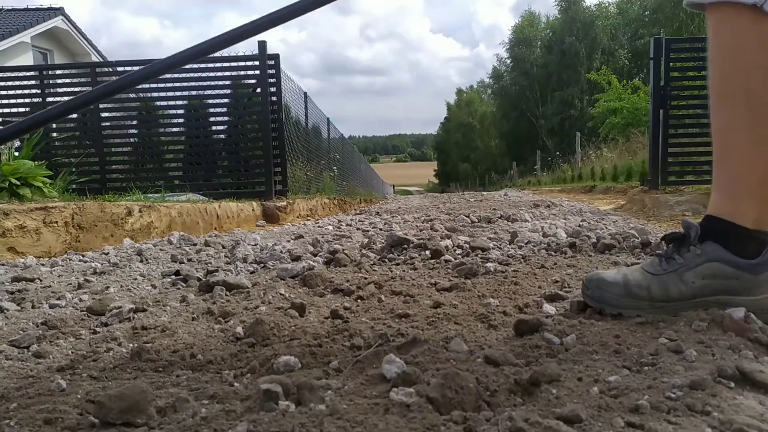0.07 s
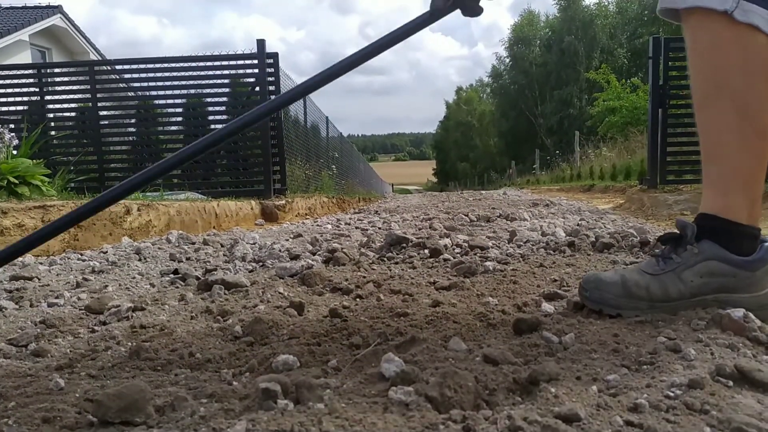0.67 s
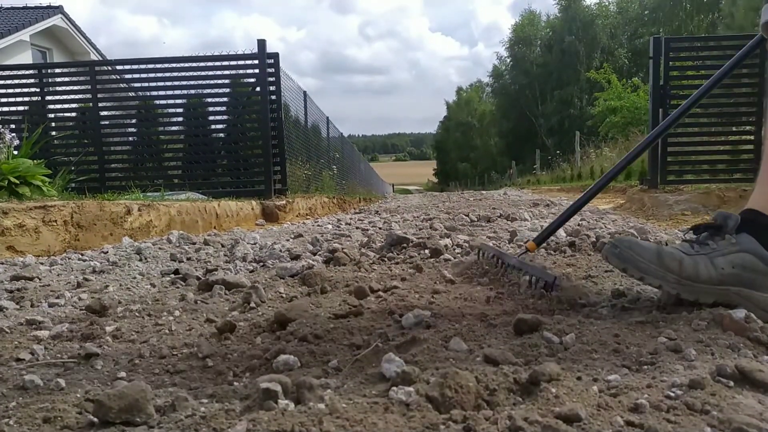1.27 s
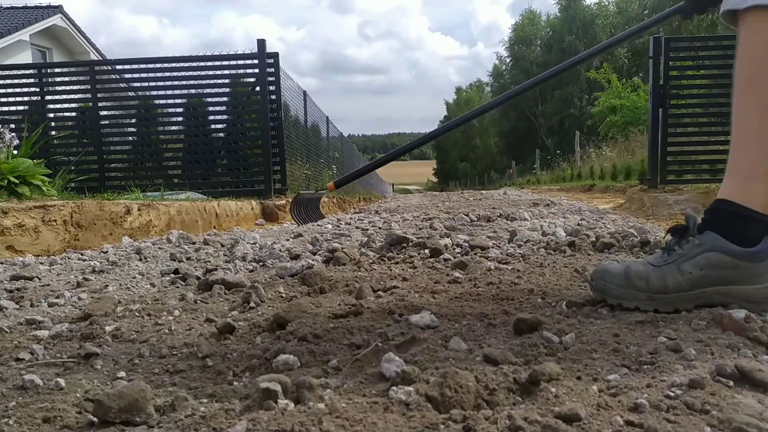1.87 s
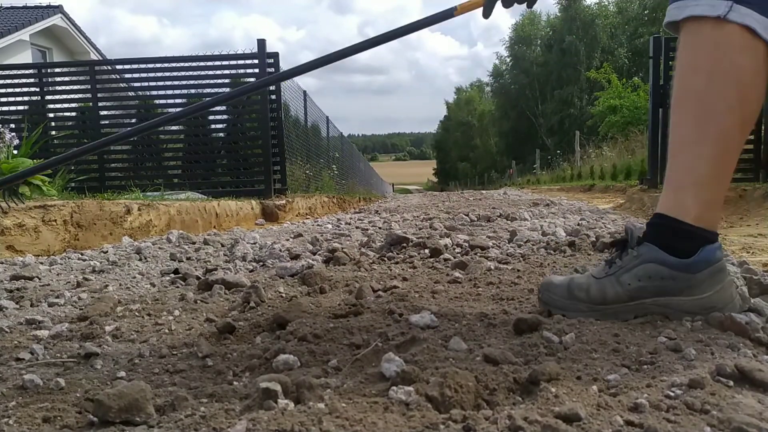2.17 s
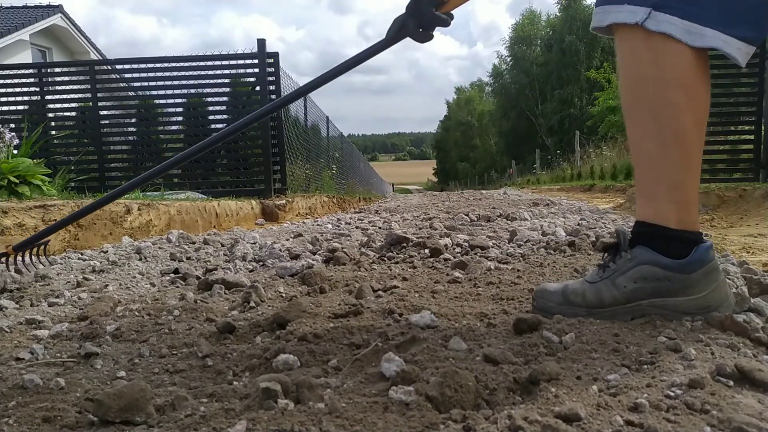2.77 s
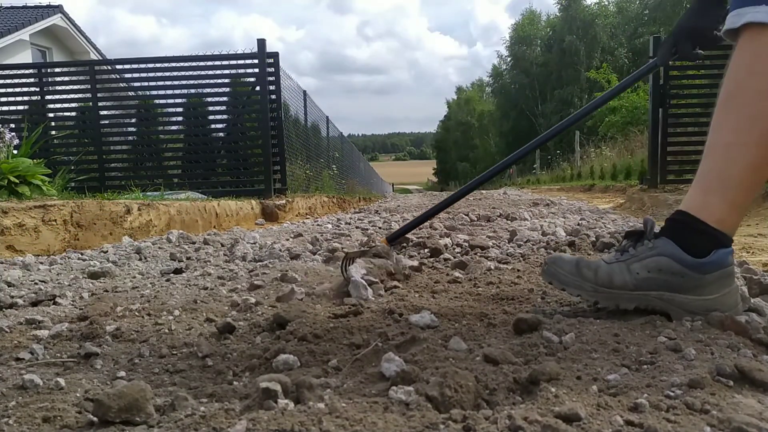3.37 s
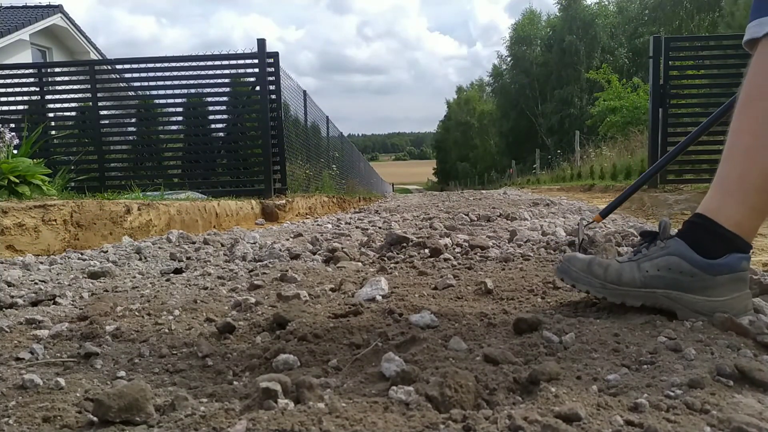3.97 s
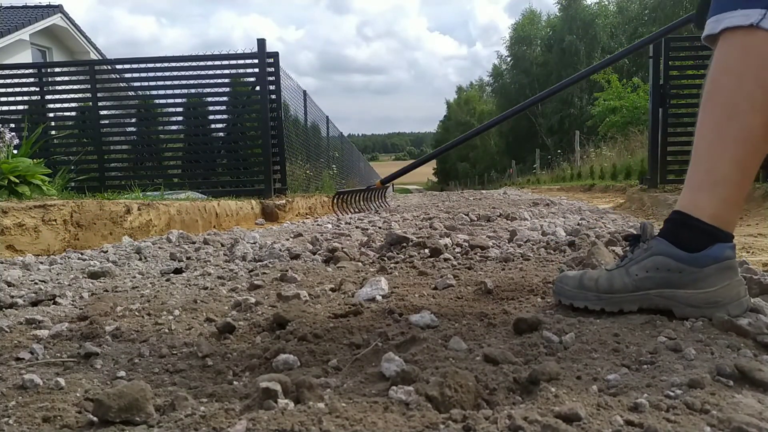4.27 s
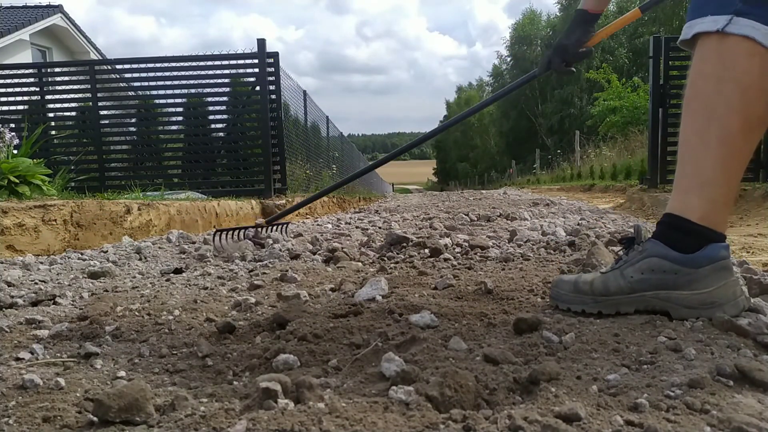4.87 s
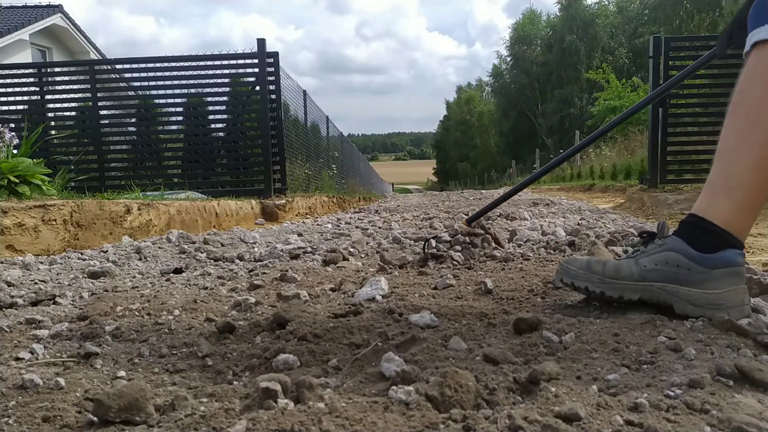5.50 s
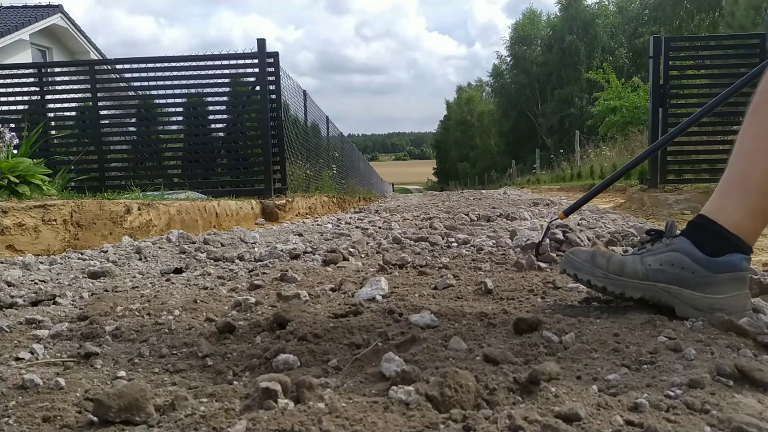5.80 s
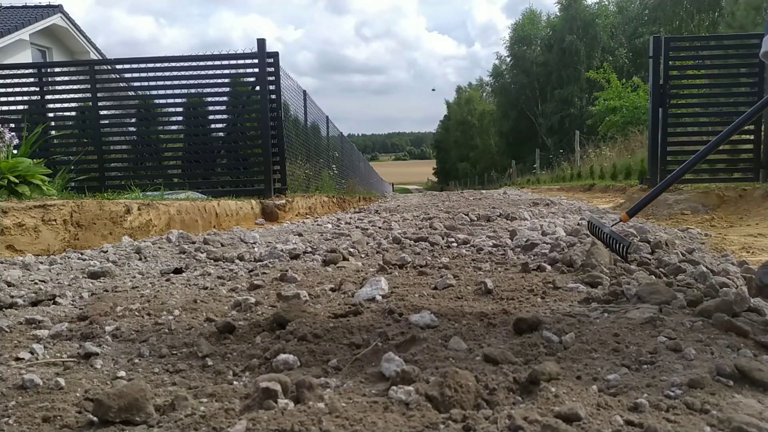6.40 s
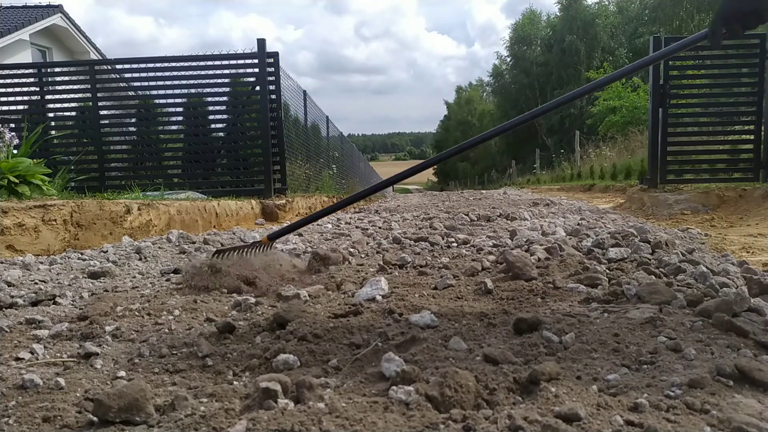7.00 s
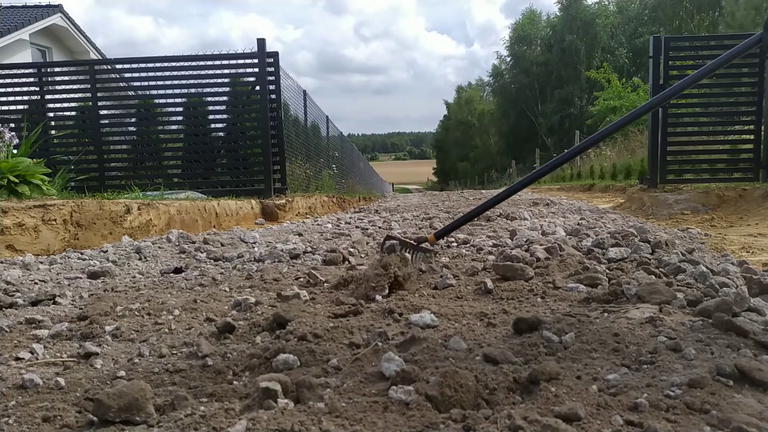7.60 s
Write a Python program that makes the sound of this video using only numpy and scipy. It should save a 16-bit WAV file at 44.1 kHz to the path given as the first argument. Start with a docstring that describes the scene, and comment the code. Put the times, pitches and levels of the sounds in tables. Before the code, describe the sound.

A steel rake drags through gravel and dry soil in four gritty, crackling pulls, with stones clacking and light wind outdoors.

```python
"""A steel rake works through gravel and dry soil, close to a two-port microphone on the ground outdoors.
A gust rumbles on the ports at first, over a faint far hiss. The head lands: stones clack, the handle
rings, gravel spills. The tines catch on big stones and drag a crackling load that sets the head ringing;
clods and a shoe thud. Lifted free, the tines sing faintly. Three more pulls follow, with light scuffs
between them, and the wind rises again under the last."""
import sys
import numpy as np
from scipy import signal
from scipy.fft import rfft, irfft, next_fast_len
from scipy.io import wavfile
from scipy.ndimage import uniform_filter1d, map_coordinates

SR = 44100
rng = np.random.default_rng(int(sys.argv[2]) if len(sys.argv) > 2 else 0)


def bounce(signal):
    """Save signal as a 16-bit WAV file at the path given by the first command-line argument."""
    frames = np.transpose(np.atleast_2d(signal))
    limited = np.clip(frames, -1, 1)
    pcm = np.round(limited * 32767).astype(np.int16)
    wavfile.write(sys.argv[1], SR, pcm)


N = 337365
TIME = np.arange(N) / SR
BAND_EDGES_HZ = np.geomspace(22, 16400, 28)
BAND_CENTRES_HZ = np.sqrt(BAND_EDGES_HZ[1:] * BAND_EDGES_HZ[:-1])
# The rake head lands and spills gravel. Each row: time in seconds, strike level in dB, spill level in dB,
# spill t60 in seconds, share of coarse stones in dB.
LANDINGS = [(0.0893, -13, -14.5, 0.25, -5), (0.2571, -10, -20.5, 0.12, -7), (0.369, -16, -28.5, 0.26, -9),
            (2.403, -13, -21, 0.22, -1.5), (4.564, -11.5, -38.5, 0.65, -0.5),
            (4.644, -17.5, -26, 0.1, -0.5), (4.706, -25, -23.5, 0.17, -3), (6.918, -10, -22, 0.73, -5)]


def from_db(db):
    """Decibels to gain."""
    return 10 ** (np.asarray(db) / 20)


def unit_rms(x):
    """Scale to an rms of 1."""
    return x / np.sqrt(np.mean(x ** 2) + 1e-20)


def in_time(curve):
    """Read an automation curve at every sample."""
    return np.interp(TIME, *np.transpose(curve))


def at_hz(spectrum, hz):
    """Read a spectrum on a log-frequency axis."""
    points_hz, values = np.transpose(spectrum)
    return np.interp(np.log(hz + 1e-9), np.log(points_hz), values)


def drift(rate):
    """Smooth random wobble of rms 1 that changes about rate times a second."""
    step, settle = 20, 2000
    pole = np.exp(-2 * np.pi * rate * step / SR)
    noise = rng.standard_normal(N // step + settle + 2)
    slow = signal.lfilter([1], [1, -2 * pole, pole * pole], noise)[settle:]
    return np.interp(np.arange(N) / step, np.arange(len(slow)), unit_rms(slow))


def resonance(x, hz, width_hz):
    """A two-pole resonance with gain 1 at its peak."""
    r = np.exp(-np.pi * width_hz / SR)
    feedback = [1, -2 * r * np.cos(2 * np.pi * hz / SR), r * r]
    return signal.lfilter(np.array([1, 0, -1]) * (1 - r * r) / 2, feedback, x)


def at_ports(x):
    """Mono to stereo: the rake's bearing shifts the left port in time, and the port turns the phase."""
    # The rake's bearing. Each row: time in seconds, lag of the left port in samples.
    bearing = [(0, 12), (.75, 12), (1.0, 5), (1.2, -7), (2.0, -9), (2.36, 6), (3.1, 5.3), (3.25, 4),
               (3.55, -3), (4.0, -12), (4.54, -1), (5.6, -3.7), (6.05, -7), (6.45, -14), (7.0, -10),
               (7.65, -11)]
    # The left port against the right. Each row: frequency in Hz, phase lead in radians.
    port_phase = [(500, 0), (1500, -1.1), (2800, -.9), (4300, 0), (6500, 1.0)]
    left = map_coordinates(x, [np.arange(N) - in_time(bearing)], order=3)
    size = next_fast_len(N + SR // 10)
    turn = np.exp(1j * at_hz(port_phase, np.arange(size // 2 + 1) * SR / size))
    return np.array([irfft(rfft(left, size) * turn, size)[:N], x])


def coloured_noise(spectrum):
    """Unrelated noise at each port with the given spectrum; rms 1."""
    size = next_fast_len(N)
    hz = np.arange(size // 2 + 1) * SR / size
    colour = from_db(at_hz(spectrum, hz)) * (hz > BAND_EDGES_HZ[0])
    white = rng.standard_normal((2, size))
    return unit_rms(irfft(rfft(white) * colour, size)[:, :N])


def wind(level_db, lumps_db):
    """Gusts buffet the ports with a lumpy rumble."""
    # The gusts. Each row: time in seconds, level in dB.
    gusts = [(0.0, -45.5), (0.53, -38.5), (1.19, -58), (1.3, -41.5), (1.51, -57.5), (2.3, -68), (3.6, -70),
             (4.3, -74.5), (6.2, -64), (6.99, -73), (7.59, -50), (7.65, -64)]
    # The rumble's colour. Each row: frequency in Hz, density in dB.
    colour = [(25, -33), (50, 4), (80, 0.5), (130, -7), (200, -15), (400, -42), (1000, -45), (16000, -89.5)]
    lumps = unit_rms(from_db(lumps_db * drift(rate=27.0)))
    return from_db(in_time(gusts) + level_db) * lumps * coloured_noise(colour)


def far_hiss(level_db):
    """A smooth bed of distant hiss that slowly swells and sinks."""
    # The bed's fader. Each row: time in seconds, level in dB.
    fader = [(0, -44.5), (1.7, -54.5), (2.2, -48), (2.4, -51), (4.1, -51), (4.5, -51.5), (6.0, -44.5),
             (7.65, -50.5)]
    # The bed's colour. Each row: frequency in Hz, density in dB.
    colour = [(25, 4.5), (100, 5.5), (300, 3), (800, 1), (1600, -7), (3500, -8.5), (7000, -5), (10000, -9),
              (16000, -15.5)]
    return from_db(in_time(fader) + level_db) * coloured_noise(colour)


def swell(s, db, rise, t60):
    """Power of one contact peaking at s: it grows by 60 dB over rise and dies by 60 dB over t60."""
    power = np.zeros(N)
    near = slice(max(int((s - rise) * SR), 0), int((s + t60) * SR) + 1)
    age = TIME[near] - s
    power[near] = from_db(db - 60 * np.maximum(-age / rise, age / t60)) ** 2
    return power


def snags(per_s, t60, share, spread_db=4, rise_s=0.0009):
    """Small stones snag and let go, so a share of the power comes in jerks; mean 1."""
    hits = (rng.random(N) < per_s / SR) * from_db(spread_db * rng.random(N)) ** 2
    dying, growing = from_db(-60 / (t60 * SR)) ** 2, np.exp(-1 / (rise_s * SR))
    jerks = signal.lfilter([1], np.poly([dying, growing]), hits + 1e-18)
    return 1 - share + share * jerks / jerks.mean()


def rake_effort(drag_db, catch_db, strike_db):
    """Power put into fine grit, coarse stones and soil by pulls, catches, landings and scuffs."""
    # How hard the tines bear on the gravel, one curve a pull. Each point: time in seconds, level in dB.
    pulls = [
        [(.57, -25), (.625, -11.5), (.78, -14.5), (.88, -24.5), (1.33, -25.5), (1.48, -35), (1.54, -47),
         (1.72, -89)],
        [(2.61, -29), (2.68, -20.5), (2.8, -23.5), (3.03, -14.5), (3.3, -29.5), (3.37, -23), (3.55, -27),
         (3.8, -39.5), (4.18, -69)],
        [(4.72, -31), (4.8, -15), (4.96, -28.5), (5.02, -18), (5.16, -29.5), (5.25, -15), (5.47, -31),
         (5.6, -26.5), (5.8, -40), (6.05, -47)],
        [(7.2, -42.5), (7.33, -29), (7.5, -24), (7.65, -19)],
    ]
    # The ground under each pull. Each row: share of coarse stones in dB, soil level in dB.
    grounds = [(-7, -26.5), (-4.5, -27.5), (-5, -30.5), (-5.5, -29.5)]
    # The tines catch on big stones. Each row: time in seconds, peak in dB, rise in seconds,
    # t60 in seconds, share of coarse stones in dB.
    catches = [(0.164, -13.5, 0.024, 0.025, -13), (0.336, -16, 0.013, 0.04, -7),
               (0.399, -12.5, 0.088, 0.081, -4.5), (0.449, -16.5, 0.0058, 0.09, -3),
               (0.467, -15.5, 0.008, 0.075, -4), (0.494, -8.5, 0.004, 0.027, -14),
               (0.511, -9.5, 0.023, 0.088, -9.5), (0.533, -14, 0.015, 0.12, -3),
               (0.593, -11.5, .005, 0.077, -2), (0.613, -3, 0.023, 0.098, -9.5),
               (0.952, -8, 0.039, 0.089, -1.5), (1.048, -12, .015, 0.035, -19), (1.17, -19, .15, 0.05, -13),
               (1.338, -16, 0.031, 0.061, -24), (1.373, -9, 0.012, 0.045, -6.5),
               (1.453, -17.5, 0.018, 0.064, -11), (2.648, -7, 0.033, 0.036, -5),
               (2.709, -8.5, 0.0046, 0.05, -12), (2.802, -5, 0.0062, 0.037, -10),
               (2.954, -5.5, 0.13, 0.15, -3), (3.008, -1, 0.025, 0.075, -22),
               (3.053, -6.5, 0.07, 0.11, -25.5), (3.225, -14.5, 0.17, 0.22, -7.5),
               (3.341, -22, .01, 0.1, -6), (3.419, -18, 0.0092, 0.14, -9), (3.682, -14.5, 0.07, 0.056, -7),
               (4.765, -10.5, 0.0049, 0.057, 0), (4.803, -3.5, 0.0075, 0.029, -10.5),
               (4.889, -10, 0.079, 0.045, 0), (4.913, -9.5, 0.025, 0.039, -5.5),
               (4.976, -4.5, 0.0061, 0.069, -5.5), (5.05, -15, .04, 0.29, -1.5),
               (5.113, -7, 0.012, 0.024, -9), (5.193, -6, 0.017, 0.061, -7), (5.211, -3, 0.013, 0.029, -5),
               (5.257, -16, 0.04, 0.07, 6), (5.307, -18, 0.028, .04, -6), (5.338, -14, 0.0044, 0.097, 6),
               (5.589, -19, 0.048, 0.035, -21), (6.928, -2, 0.02, 0.057, -10),
               (7.147, -8.5, 0.074, 0.064, -26), (7.389, -18, .01, 0.05, -16),
               (7.425, -13.5, 0.026, 0.04, -7), (7.442, -10.5, 0.017, 0.017, -2),
               (7.48, -9.5, 0.02, 0.12, -11), (7.56, -13.5, 0.032, 0.058, -7.5),
               (7.594, -14, 0.056, 0.026, -24), (7.638, -8, 0.056, 0.054, -26)]
    # Shoe or rake brushes the ground. Each row: time in seconds, gravel in dB, soil in dB, t60 in seconds.
    scuffs = [(1.606, -46.5, -57, 0.32), (2.08, -64, -52.5, 0.38), (2.239, -70, -48, 0.34),
              (2.545, -30.5, -46, 0.35), (3.998, -46, -51, 0.22), (5.9, -47.5, -56, 0.65),
              (6.214, -41, -46.5, 0.34), (6.29, -41, -43.5, 0.23), (6.428, -53.5, -46.5, 0.62),
              (6.683, -35, -42, 0.27)]
    soil_follows = 0.65   # soil takes this share of the gravel's swing in dB
    heap_db_per_s = 4   # soil heaps up before the tines
    spill_delay_s, scuff_rise_share = 0.0065, 0.76
    loose_stones_db, loose_soil_db = -2.5, -28
    total, coarse, soil, caught, spilled = np.zeros((5, N))
    jerks = snags(per_s=85, t60=0.025, share=0.28)
    pebbles = snags(per_s=140, t60=0.008, share=0.5)   # a light touch turns single pebbles
    for pull, (stones_db, soil_db) in zip(pulls, grounds):
        start, end = pull[0][0], pull[-1][0]
        level_db = in_time(pull)
        down = (TIME >= start) & (TIME < end)
        drag = down * jerks * from_db(level_db + drag_db) ** 2
        total += drag
        coarse += drag * from_db(stones_db) ** 2
        soil += down * from_db(soil_db + soil_follows * level_db + heap_db_per_s * (TIME - start)) ** 2
    for s, db, rise, t60, stones_db in catches:
        catch = swell(s, db + catch_db, rise, t60)
        caught += catch
        coarse += catch * from_db(stones_db) ** 2
    for s, _, db, t60, stones_db in LANDINGS:
        spill = swell(s + spill_delay_s, db, spill_delay_s, t60)
        spilled += spill
        coarse += spill * from_db(stones_db) ** 2
    scuffed = pebbles * sum(swell(s, db, scuff_rise_share * t60, t60) for s, db, _, t60 in scuffs)
    soil += sum(swell(s, db, scuff_rise_share * t60, t60) for s, _, db, t60 in scuffs)
    soil += (caught + spilled) ** soil_follows * from_db(loose_soil_db) ** 2
    total += caught + spilled + scuffed
    coarse += scuffed * from_db(loose_stones_db) ** 2
    coarse = np.minimum(coarse, 0.85 * total)   # there is always some grit
    fine = total - coarse
    for s, db, _, _, stones_db in LANDINGS:
        strike = swell(s, db + strike_db, rise=0.011, t60=0.04)   # the tines touch down one by one
        fine += strike
        coarse += strike * from_db(stones_db) ** 2
    return fine, coarse, soil


def band_shares(spectrum):
    """The share of a spectrum's power in each band."""
    power = from_db(at_hz(spectrum, BAND_CENTRES_HZ)) ** 2 * np.diff(BAND_EDGES_HZ)
    return power / power.sum()


def band(x, index):
    """One band of the filter bank; white noise keeps its rms."""
    low, high = BAND_EDGES_HZ[index:index + 2]
    bandpass = signal.butter(2, [low, high], "band", fs=SR, output="sos")
    return signal.sosfilt(bandpass, x + 1e-18) * np.sqrt(SR / 2 / (high - low))


def grains(per_s, spread_db, scatter_s):
    """Uneven random clicks and their scatter off the ground; rows: straight, scattered left and right."""
    at = np.flatnonzero(rng.random(N, dtype=np.float32) < per_s / SR)
    chance = rng.random(N, dtype=np.float32)[at]
    size_db = spread_db * np.minimum(-np.log(chance + 1e-9), 4)
    clicks = np.zeros(N)
    clicks[at] = from_db(size_db) * (-1.) ** at
    clicks = unit_rms(clicks)
    pole = np.exp(-1 / (scatter_s * SR))
    halo = np.sqrt(signal.lfilter([1 - pole], [1, -pole], clicks ** 2 + 1e-18))
    return np.vstack([clicks, halo * rng.standard_normal((2, N), dtype=np.float32)])


def clinks(index, gain, per_s, t60, spread_db):
    """Knocked stones ring, each at its own pitch in a band; rows: straight, scattered left and right."""
    low, high = BAND_EDGES_HZ[index:index + 2]
    when, pitch, force, *phases = rng.random((int(per_s * N / SR), 6)).T
    at = (when * N).astype(int)
    hz = low + pitch * (high - low)
    size = unit_rms(from_db(spread_db * force))
    age = np.arange(int(t60 * SR)) / SR
    fade = from_db(-60 * age / t60) * np.minimum(age * low / 2, 1)
    fade /= np.sqrt(np.sum(fade ** 2) * per_s / SR / 2)   # unit power for the whole shower
    envelopes = np.outer(size * gain[at], fade)
    places = (at[:, None] + np.arange(len(age))).ravel()
    rings = [envelopes * np.sin(2 * np.pi * (np.outer(hz, age) + phase[:, None])) for phase in phases]
    return np.array([np.bincount(places, ring.ravel(), N)[:N] for ring in rings])


def gravel(stone_db, thud_db, judder_db, patchy_db, grains_per_s, base_per_s, clink_share, snap_share):
    """Grit, stones and soil crackle and clods thud; returns the stereo crunch and its share of stones."""
    # Colours of bright grit, coarse stones, dry soil and thuds. Each row: frequency in Hz, density in dB.
    grit_colour = [(100, -27), (700, -35), (1500, -13.5), (3300, -44), (4600, 4), (6500, -1), (8200, 1.5),
                   (10500, 1), (12500, -12), (15500, -6.5)]
    stone_colour = [(100, -37.5), (700, -19), (1400, -13), (2000, -5.5), (2700, -0.5), (3700, -0.5),
                    (4600, -5), (6500, 0), (16000, -47.5)]
    soil_colour = [(60, 0), (160, -1), (300, 1.5), (700, 2), (1200, 0), (2000, -9), (5000, -38.5),
                   (16000, -47.5)]
    thud_colour = [(60, -1), (150, 8), (300, 7.5), (700, 0.5), (1300, 0), (2500, -45), (16000, -55.5)]
    # Dull knocks of clods, rake head and shoe. Each row: time in seconds, peak in dB.
    knocks = [(0.518, -43), (0.947, -47), (1.275, -31), (1.334, -49), (1.452, -41.5), (2.07, -44),
              (2.641, -48), (2.95, -38), (3.537, -34.5), (3.676, -35), (3.828, -46.5), (4.569, -55),
              (5.251, -43), (5.416, -43), (6.928, -35.5)]
    fine, coarse, soil = rake_effort(drag_db=-6.0, catch_db=-7.5, strike_db=-3.5)
    thuds = sum(swell(s, db + thud_db, rise=0.058, t60=0.059) for s, db in knocks)
    layers = [(fine, band_shares(grit_colour)),
              (coarse * from_db(stone_db) ** 2, band_shares(stone_colour)),
              (soil, band_shares(soil_colour)),
              (thuds, band_shares(thud_colour))]
    # Sound that comes straight, not scattered by the ground. Each row: frequency in Hz, share of power.
    direct_shares = [(100, .88), (450, .95), (1200, .45), (2000, .6), (2600, .97), (3800, .97), (5000, .62),
                     (8000, .5), (15000, .18)]
    judder = unit_rms(from_db(judder_db * drift(rate=50)))   # stick and slip shakes all bands together
    snaps = grains(per_s=280, spread_db=2.8, scatter_s=0.0022)   # dry snaps hit all bands at once
    straight, scattered = np.zeros(N), np.zeros((2, N))
    for k, hz in enumerate(BAND_CENTRES_HZ):
        if hz < 70:
            continue
        flicker = unit_rms(from_db(patchy_db * drift(rate=13.7)))
        gain = np.sqrt(sum(power * share[k] for power, share in layers)) * judder * flicker
        # small grains are many and ring high, big ones are few and low
        per_s = base_per_s + grains_per_s * hz / BAND_CENTRES_HZ[-1]
        crackle = grains(per_s, spread_db=-1.5, scatter_s=0.0028)
        contacts = np.sqrt(1 - snap_share) * crackle + np.sqrt(snap_share) * (-1) ** k * snaps
        crunch = band(contacts * gain, k)
        if hz > 1200:
            ringing = clinks(k, gain, per_s=130, t60=0.034, spread_db=13)
            crunch = np.sqrt(1 - clink_share) * crunch + np.sqrt(clink_share) * ringing
        direct = at_hz(direct_shares, hz)
        straight += np.sqrt(direct) * crunch[0]
        scattered += np.sqrt(1 - direct) * crunch[1:]
    stony = uniform_filter1d(coarse / (fine + coarse + 1e-18), size=SR // 100)
    return at_ports(straight) + scattered, stony


def rake_head(crunch, stony, level_db, vary_db, stone_damping):
    """Contacts ring the steel head; its modes waver as the load shifts, and coarse stones damp them."""
    # Modes of the head in the gravel. Each row: frequency in Hz, width in Hz, boost in dB.
    modes = [(2070, 40, 5), (2583, 35, 7), (3051, 70, 5), (3595, 55, 9), (3820, 70, 7.5), (4150, 150, -3),
             (4540, 110, 11), (5240, 45, 8), (5706, 60, 6), (6030, 80, 6), (6510, 90, 7), (6770, 60, 9),
             (7640, 75, 9.5), (8130, 110, 6.5), (8590, 55, 7), (9125, 70, 7), (10190, 110, 8),
             (10900, 90, 7), (12490, 110, 5), (15100, 400, 4)]
    rung = crunch
    for hz, width, boost_db in modes:
        boost = from_db(boost_db + vary_db * drift(rate=5.8))
        rung = rung + (boost - 1) * resonance(rung, hz, width)
    return from_db(level_db) * (crunch + (1 - stone_damping * stony) * (rung - crunch))


def clacks(level_db, snap, crumble_t60, scatter_db, ring_db, band_hz):
    """A stone is knocked: a sharp snap and a brief crumbling, coloured by the stone's own short ring."""
    # Stones hit by a tine or dropping on others. Each row: start in seconds, peak in dB, ring in Hz.
    hits = [(0.087, -11, 4000), (0.101, 0, 6380), (0.116, -2.5, 8340), (0.2548, -6, 7850),
            (0.323, -22.5, 2090), (0.398, -8, 3810), (0.4488, -13.5, 3400), (0.466, -12.5, 2550),
            (0.492, -7.5, 8300), (0.5103, -6, 3650), (0.613, -2.5, 3800), (0.7364, -7, 4500),
            (0.838, -7.5, 7800), (0.949, -7.5, 7200), (1.883, -42.5, 11000), (2.404, -24.5, 8300),
            (2.707, -10, 6240), (2.9547, -17, 6500), (3.011, -19.5, 7700), (3.0437, -6, 4970),
            (3.2285, -9, 8040), (3.543, -10, 5960), (3.853, -28.5, 5030), (4.221, -44.5, 5930),
            (4.564, -18, 4450), (4.7655, -12.5, 3880), (4.805, -6, 6250), (4.811, -11, 4470),
            (4.885, -4, 6300), (4.896, -11, 3900), (4.978, -29, 2320), (4.999, -7.5, 3160),
            (5.048, -7, 3800), (5.092, -14, 3170), (5.1144, -8, 3480), (5.21, -19, 3580),
            (5.2575, -5.5, 3870), (5.307, -12, 3760), (5.3382, -6, 4250), (5.388, -11.5, 5500),
            (5.453, -13.5, 4530), (5.5363, -17.5, 5000), (5.559, -12.5, 5700), (5.59, -19, 5460),
            (5.67, -23, 7700), (5.776, -30, 4800), (5.9824, -25, 4470), (6.221, -20, 6000),
            (6.286, -26, 5840), (6.3226, -24.5, 2220), (6.4076, -21.5, 2500), (6.4135, -20, 9270),
            (6.4425, -22, 3080), (6.4635, -30, 6700), (6.4772, -28, 4100), (6.662, -18.5, 9670),
            (7.148, -14.5, 6400), (7.442, -17, 4480), (7.4815, -9, 4560), (7.624, -11.5, 6660)]
    out = np.zeros((3, N + SR))   # straight, scattered left, scattered right
    age = TIME[:SR // 25]
    thin = signal.butter(2, band_hz, "band", fs=SR, output="sos")
    for s, db, hz in hits:
        contact = rng.standard_normal((3, len(age))) * from_db(-60 * age / crumble_t60)
        contact[0, 0] += snap
        contact[1:] *= from_db(scatter_db)
        knock = signal.sosfilt(thin, contact) + from_db(ring_db) * resonance(contact, hz, width_hz=380)
        out[:, int(s * SR):][:, :len(age)] += from_db(db + level_db) * knock / np.abs(knock[0]).max()
    return at_ports(out[0, :N]) + out[1:, :N]


def tone(s, hz, db, t60, onset_s):
    """One mode that starts at s and dies away."""
    age = TIME[TIME >= s][:int(t60 * SR)] - s
    fade = from_db(db - 60 * age / t60) * (1 - np.exp(-age / onset_s))
    out = np.zeros(N)
    out[int(s * SR):][:len(age)] = fade * np.sin(2 * np.pi * (hz * age + rng.random()))
    return out


def handle(level_db):
    """Each landing knocks the handle into a short ring."""
    # Modes of the handle and steel bar. Each row: frequency in Hz, level in dB, t60 in seconds.
    modes = [(699, -6.5, 0.11), (1326, -15.5, 0.4), (1600, 3, 0.083), (1720, -13.5, 0.38), (1960, 4, 0.041),
             (3290, -18.5, 0.59)]
    return sum(tone(s, hz, strike_db + mode_db + level_db, t60, onset_s=0.0023)
               for s, strike_db, *_ in LANDINGS for hz, mode_db, t60 in modes)


def free_tines(waver_db):
    """Lifted out of the gravel, tines sing unevenly until they fade or the next landing damps them."""
    # Single tines slip free. Each row: start in seconds, pitch in Hz, level in dB, rise and t60 in seconds.
    releases = [(1.56, 5800, -60.5, 0.0077, 1.6), (1.56, 5250, -56, 0.01, 0.51),
                (2.2, 6670, -50, 0.055, 0.4), (4.1, 3260, -67.5, 0.01, 3.6), (6.756, 5840, -32, 0.09, 1.1),
                (6.754, 5820, -43, 0.19, 2.2)]
    out = np.zeros(N)
    for s, hz, db, rise, t60 in releases:
        next_landing = min(landing[0] for landing in LANDINGS if landing[0] > s)
        out += tone(s, hz, db, t60, rise) * from_db(waver_db * drift(rate=45)) * (TIME < next_landing)
    return out


def scene():
    """The rake moves from side to side in the gravel, over wind and far hiss."""
    # The rake's side. Each row: time in seconds, left minus right in dB.
    pan = [(0, -3), (.8, -0.5), (1.4, 2.5), (2.4, -2), (3.6, 1.1), (4.6, -1), (5.2, -1), (5.6, 4), (6.9, 3),
           (7.3, 0.5)]
    crunch, stony = gravel(stone_db=1.5, thud_db=6.5, judder_db=0.32, patchy_db=3.0,
                           grains_per_s=2200, base_per_s=300, clink_share=0.33, snap_share=0.25)
    raking = rake_head(crunch, stony, level_db=-5.5, vary_db=2.3, stone_damping=0.7)
    stones = clacks(level_db=-5.5, snap=4.8, crumble_t60=0.015, scatter_db=3.0, ring_db=16,
                    band_hz=(1740, 12300))
    panned = (raking + stones) * from_db(np.outer([.5, -.5], in_time(pan)))
    rings = at_ports(free_tines(waver_db=4.5) + handle(level_db=-23.5))
    return panned + rings + wind(level_db=9.0, lumps_db=1.5) + far_hiss(level_db=-8.5)


def record(dry):
    """The microphone: its left port is more sensitive, both notch the high treble, and the top is cut."""
    # The ports' imbalance. Each row: frequency in Hz, left minus right in dB.
    balance = [(60, 7.2), (400, 0.22), (2500, 0.3), (4000, 3.1), (8000, 1.4), (12000, 2.7), (15000, 4.5)]
    # The ports' notches. Each row: frequency in Hz, width in Hz, gain in dB.
    notches = [(13250, 300, -10), (14100, 600, -11)]
    cutoff_hz = 15850
    size = next_fast_len(N + SR // 10)
    balance_db = at_hz(balance, np.arange(size // 2 + 1) * SR / size)
    heard = irfft(rfft(dry, size) * from_db(np.outer([.5, -.5], balance_db)), size)[:, :N]
    for hz, width, db in notches:
        heard = heard + (from_db(db) - 1) * resonance(heard, hz, width)
    return signal.sosfilt(signal.ellip(12, .1, 80, cutoff_hz, fs=SR, output="sos"), heard)


dry = scene()
out = record(dry)
bounce(out)
```